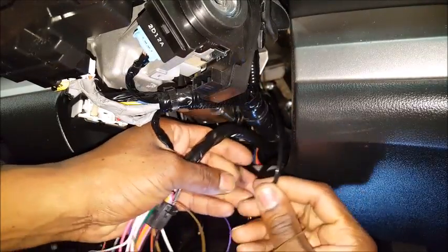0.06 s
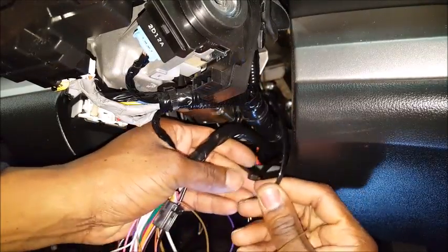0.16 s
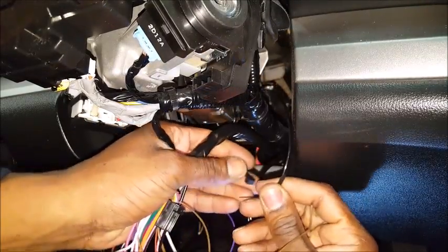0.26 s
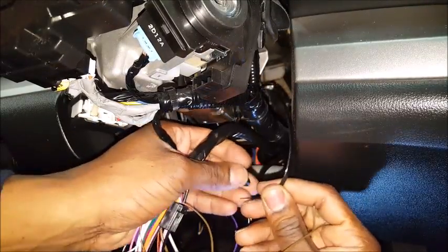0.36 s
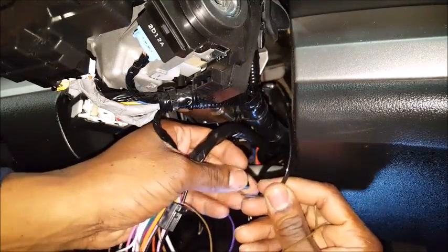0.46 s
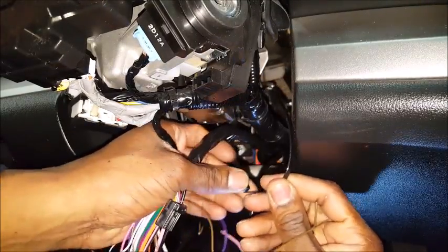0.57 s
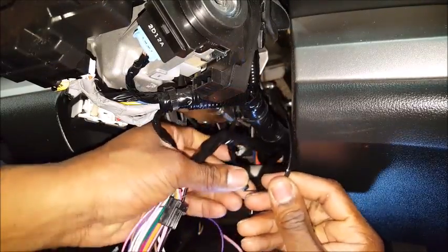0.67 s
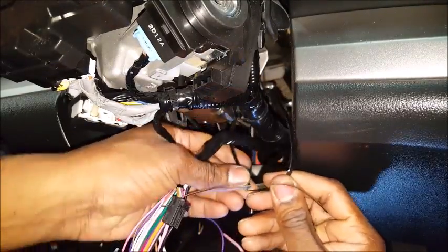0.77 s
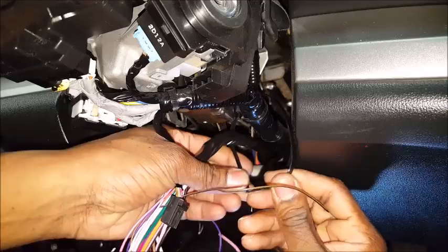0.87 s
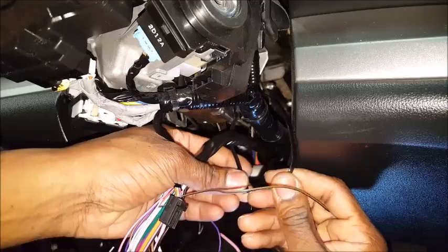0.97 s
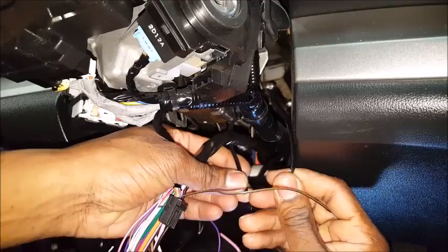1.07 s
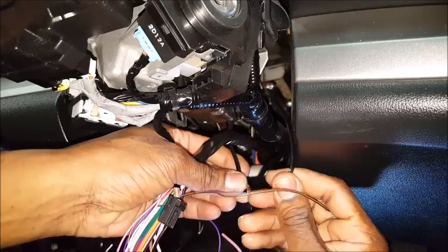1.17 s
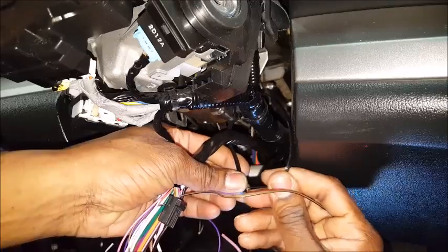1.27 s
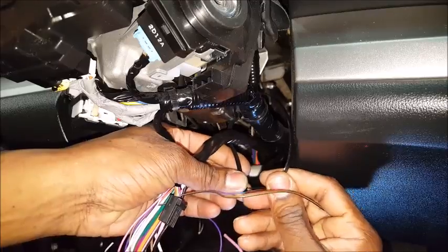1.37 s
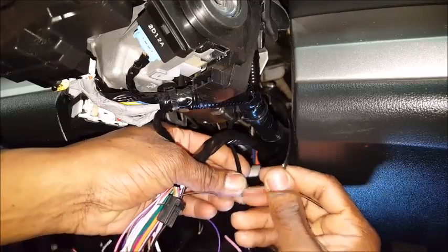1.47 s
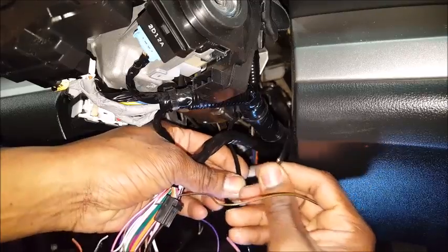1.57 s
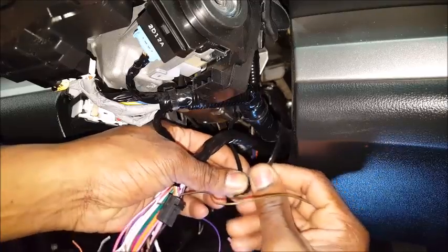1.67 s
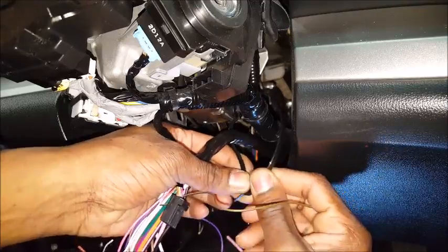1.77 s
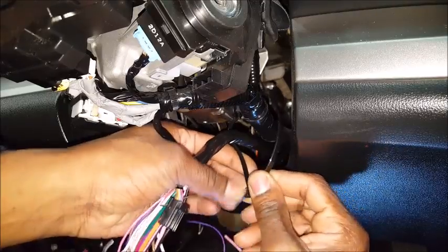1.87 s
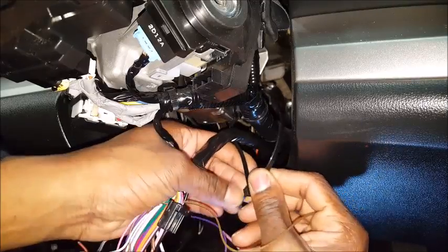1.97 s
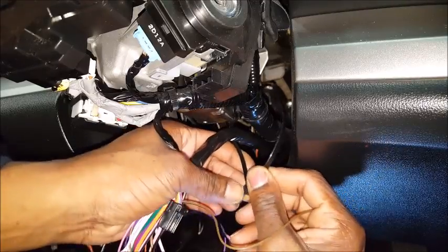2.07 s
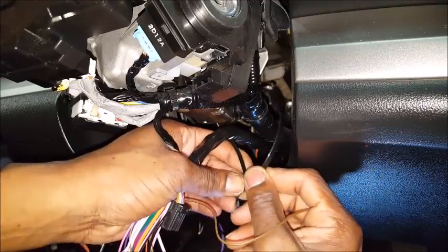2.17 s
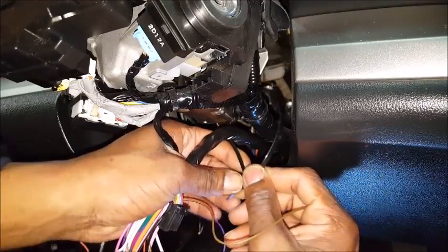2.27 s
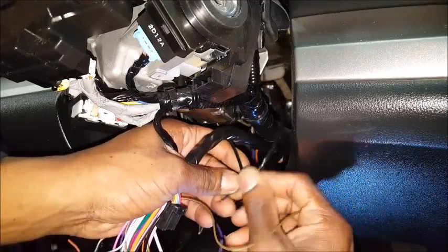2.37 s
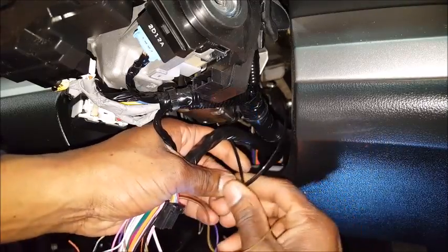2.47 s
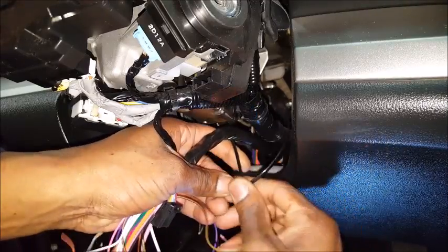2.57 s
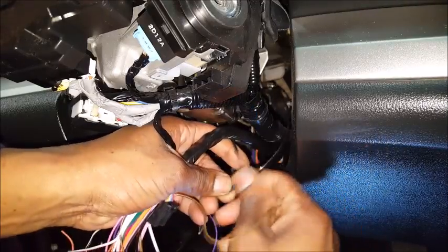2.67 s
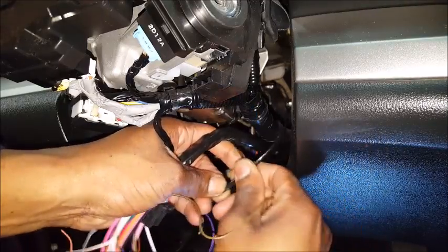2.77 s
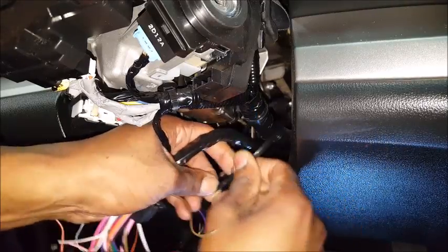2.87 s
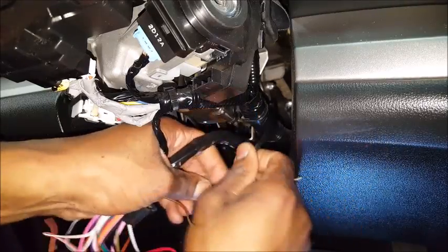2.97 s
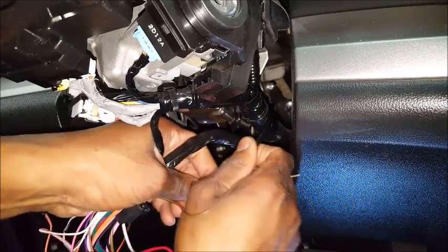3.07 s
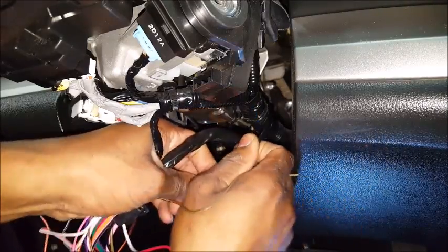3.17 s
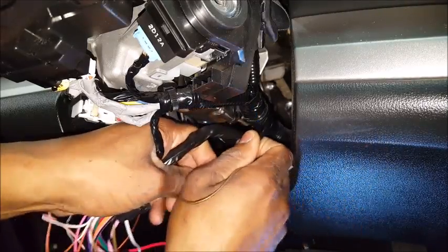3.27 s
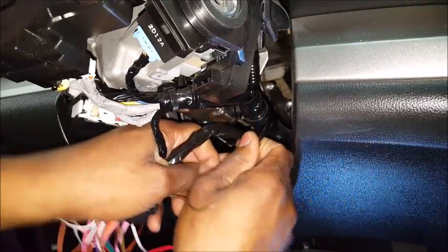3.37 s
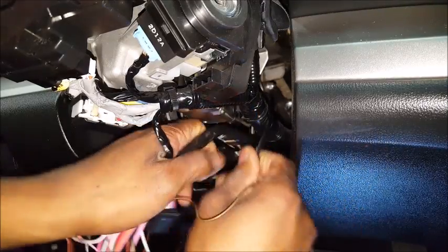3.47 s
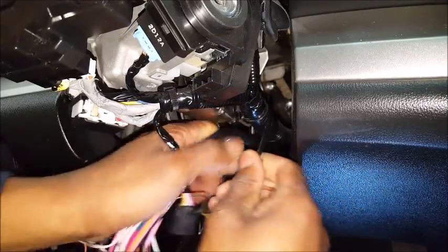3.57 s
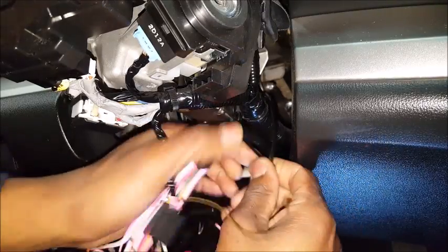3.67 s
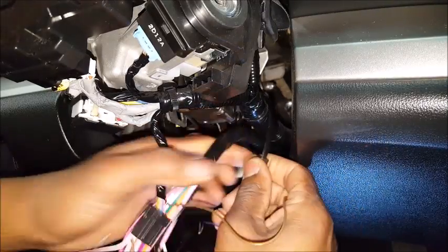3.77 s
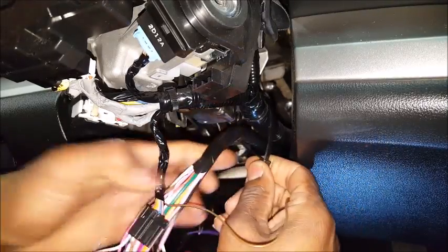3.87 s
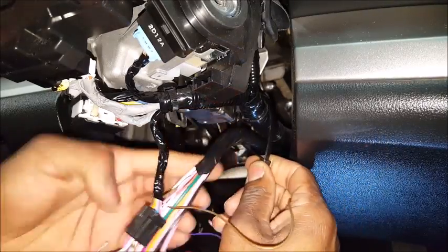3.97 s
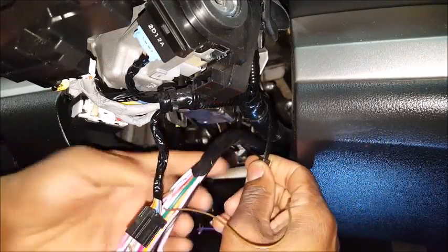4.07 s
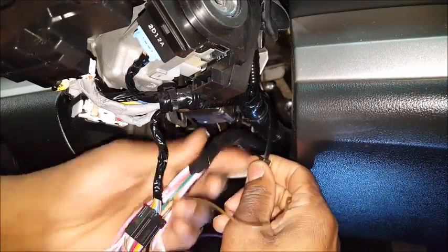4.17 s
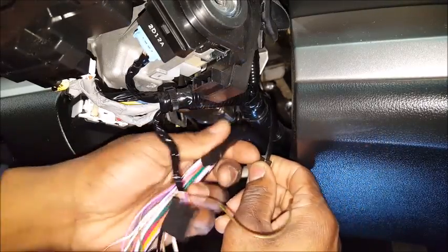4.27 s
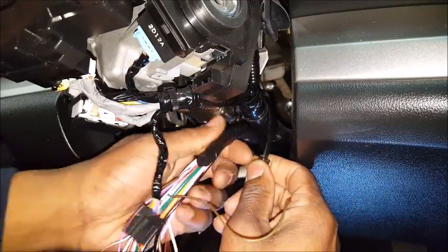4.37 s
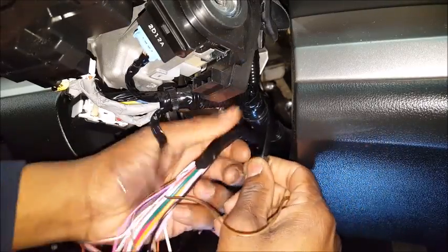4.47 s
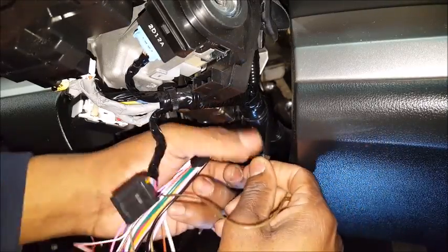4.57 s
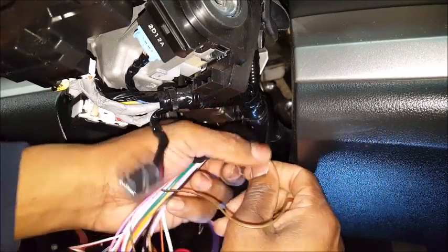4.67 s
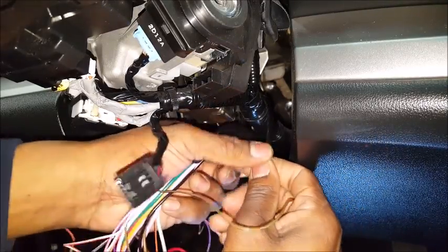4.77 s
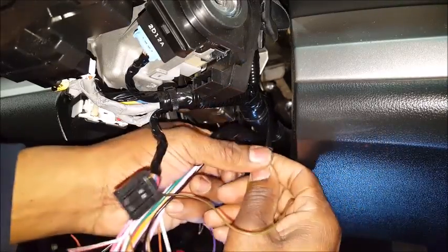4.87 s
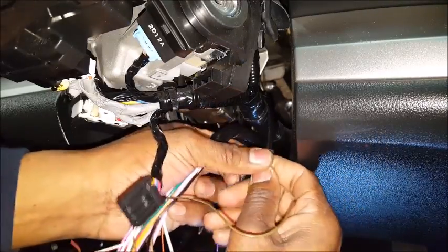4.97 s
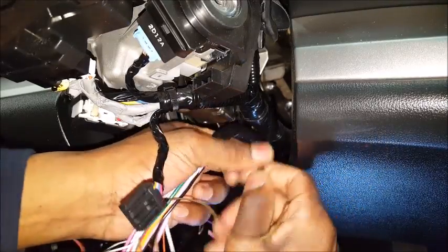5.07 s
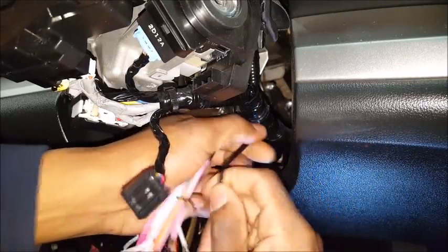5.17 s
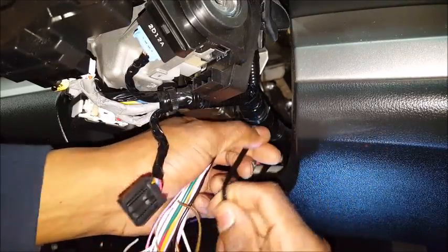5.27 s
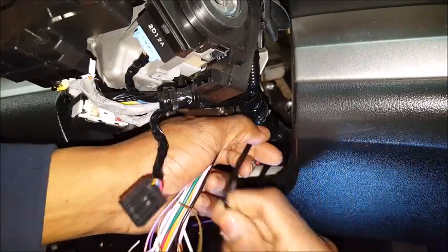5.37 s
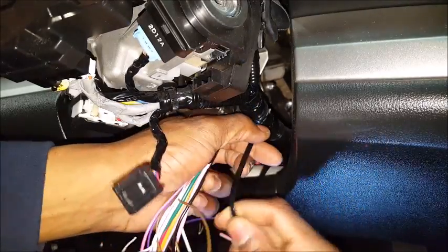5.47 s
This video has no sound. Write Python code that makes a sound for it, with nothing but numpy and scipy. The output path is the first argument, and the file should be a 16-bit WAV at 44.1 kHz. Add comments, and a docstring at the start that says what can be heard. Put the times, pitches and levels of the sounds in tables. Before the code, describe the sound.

Close stereo sound inside a quiet car. Fingers rustle and scrape faintly over taped wires with a few small plastic ticks. Near the middle, a nylon tie is pulled: a tiny zip, then bright rapid clicks with sharper cracks. Soft wire rattles and shoves follow, and near the end a fast zip breaks into single snaps. A low hush lies beneath.

```python
"""A nylon cable tie is pulled tight round a bundle of wires under a car dashboard, close by and in stereo.
The pawl snaps over the strap's teeth, one by one or in fast zips: noise bursts, with a pressure dip, crack and thud.
Wires and plastic tick with noise crackles and damped sines; a finger scrape rings hollow resonances.
Hands jostle and rustle as shaped noise, short cabin reflections follow the tie and the ticks,
and a low hush of noise with two wavering hums lies underneath."""
import sys
import numpy as np
from scipy import signal
from scipy.fft import rfft, irfft
from scipy.io import wavfile
from scipy.ndimage import uniform_filter1d

SR = 44100
rng = np.random.default_rng(int(sys.argv[2]) if len(sys.argv) > 2 else 0)


def how_loud(loudness_db):
    """Turn decibels into a plain amplitude multiplier (0 dB gives 1, 20 dB gives 10)."""
    steps = np.asarray(loudness_db, float) / 20
    return 10 ** steps


def transcribe(u):
    """Save the signal u as a 16-bit wav file named by the first command-line argument.

    u: samples, shape (n,) or (channels, n), limited to [-1, 1]; the rate is SR.
    q: integer samples, one column per channel.
    """
    v = np.clip(np.atleast_2d(u).T, -1, 1)
    q = np.round(v * 32767).astype(np.int16)
    wavfile.write(sys.argv[1], SR, q)


N = 243873  # length in samples

# Teeth where the strap catches and lets go with a crack.
# Each row: time in seconds, jerk of the strap in dB, crack in dB, snap of the pawl in dB.
CATCHES = [(2.8118, -41, -14.5, -24.5), (2.8315, -41, -13.5, -24), (2.8443, -42, -20.5, -24),
           (3.1038, -45, -22.5, -25.5), (3.1118, -34, -21.5, -25.5), (3.1213, -52, -17.5, -26.5),
           (3.1464, -48, -17, -28), (3.1968, -47, -19.5, -28.5), (3.2762, -28, -15.5, -28.5),
           (5.1139, -31, -14.5, -22.5), (5.2497, -51, -33.5, -29.5), (5.263, -53, -37.5, -29.5),
           (5.2782, -35, -26.5, -30.5), (5.3273, -39, -24.5, -29), (5.3383, -52, -34, -29),
           (5.3488, -52, -29.5, -29), (5.3608, -52, -32, -29.5), (5.3729, -52, -37, -29.5),
           (5.3822, -40, -17.5, -29.5), (5.395, -39, -26.5, -29.5), (5.4202, -46, -28.5, -30)]
# Slow, even draws of the strap, one list per draw.
# Each row: time in seconds, teeth passed, jerk in dB, snap in dB, thud of the bundle in dB.
DRAWS = [
    [(2.7539, 0, -39, -22.5, -46), (2.761, 1, -40, -22.5, -34), (2.7924, 4, -40, -23.5, -29)],
    [(2.8511, 0, -40, -24.5, -38), (2.8646, 2, -41, -24.5, -30), (2.8752, 3, -42, -25, -28),
     (2.9468, 11, -47, -24.5, -36), (2.9785, 15, -40, -23.5, -27), (2.985, 16, -39, -24, -25),
     (2.9989, 19, -39, -25, -26), (3.0311, 23, -57, -24.5, -33), (3.0657, 26, -56, -24.5, -39),
     (3.096, 29, -50, -24.5, -41)],
]
# Fast zips, one list per zip.
# Each row: time in seconds, teeth passed, jerk in dB, snap in dB, thud of the bundle in dB.
ZIPS = [
    [(2.7328, 0, -34, -20.5, -52), (2.7509, 9, -34, -23, -52)],
    [(5.1202, 0, -47, -25.5, -48), (5.142, 7, -38, -25.5, -48), (5.1627, 14, -34, -26.5, -48),
     (5.1776, 21, -40, -23.5, -48), (5.183, 24, -44, -22.5, -48), (5.192, 33, -43, -21.5, -48),
     (5.2034, 42, -44, -23.5, -48), (5.2253, 58, -49, -23.5, -48), (5.2412, 65, -50, -26.5, -48)],
]
# Colour of a snap in catches and draws. Each row: frequency in Hz, relative level in dB.
SNAP_COLOUR = [(700, -44), (2500, -37), (4300, -26), (6300, -19), (6900, -8), (10200, -1), (13000, -4),
               (15600, -8)]
# Thinner colour of a snap in a zip. Each row: frequency in Hz, relative level in dB.
ZIP_COLOUR = [(1000, -42), (2500, -30), (6200, -26), (9300, -18), (12900, 0), (15400, -14)]
# Colour of the pawl singing on after a snap. Each row: frequency in Hz, relative level in dB.
PAWL_RING = [(7000, -13.5), (9500, -44.5), (10600, 6), (11700, -1.5), (15600, -26)]
# Wires, connector and plastic ticking.
# Each row: time in seconds, crackle in dB, ring in dB, ring frequency in Hz.
TICKS = [(0.029, -50.5, -80, 2480), (0.065, -56, -51.5, 1050), (0.0821, -59, -44, 2930),
         (0.2978, -46.5, -38, 2080), (0.3103, -53, -42.5, 2130), (0.424, -72, -45, 2380),
         (0.451, -36.5, -41, 2260), (0.4946, -50.5, -44, 960), (0.549, -52, -45.5, 2150),
         (1.0895, -55.5, -44, 393), (1.3396, -57.5, -60, 2100), (1.5397, -52, -54.5, 1620),
         (1.5737, -53, -57, 2120), (1.7136, -68.5, -41, 3260), (2.1715, -50, -60, 3200),
         (2.403, -60.5, -50.5, 3300), (2.4625, -48.5, -85, 3300), (2.53, -49.5, -73, 2520),
         (2.553, -50, -54.5, 2600), (2.8272, -40, -72, 2430), (3.3056, -46.5, -51, 1210),
         (3.349, -64, -47.5, 1500), (3.394, -44.5, -50, 4140), (3.476, -45.5, -52.5, 3040),
         (3.491, -45, -53.5, 2510), (3.514, -49, -49, 2340), (3.528, -47, -58, 3500),
         (3.553, -47.5, -74, 4350), (3.59, -55.5, -53.5, 4400), (3.6285, -49.5, -40.5, 2730),
         (3.6482, -36, -48, 4060), (3.8004, -65, -51.5, 1320), (3.864, -55.5, -86, 4100),
         (4.025, -59, -57, 2030), (4.089, -48, -58.5, 3780), (4.1045, -82, -45.5, 540),
         (4.138, -65, -47.5, 930), (4.32, -59, -57, 1190), (4.3545, -87, -40, 433),
         (4.477, -63, -57.5, 1860), (4.6302, -51, -49.5, 3370), (4.808, -52.5, -48, 1970)]
# A finger scraping along the taped bundle. Each row: time in seconds, level in dB.
SCRAPE = [(.05, -72.5), (.2, -60.5), (.56, -55.5), (.74, -64), (0.819, -70)]
# Hollow resonances of the bundle, each applied twice.
# Each row: frequency in Hz, width of a single pass in Hz, relative level in dB.
SCRAPE_BODY = [(750, 460, 0), (1100, 160, -3), (2100, 590, -5.5)]
# How busy the hands are. Each row: time in seconds, rustle in dB.
HANDS = [(0, -63.5), (.3, -69), (.58, -53.5), (.83, -71), (1.04, -74), (1.5, -70), (2.1, -71.5),
         (2.4, -64.5), (2.7, -65), (3.31, -59), (3.44, -62.5), (3.56, -63.5), (3.72, -60), (3.78, -74.5),
         (4.07, -72), (4.5, -69), (4.95, -72.5), (5.53, -66.5)]
# The bundle is shoved. Each row: time in seconds, low bump in dB, its scrape in dB.
SHOVES = [(0.306, -81, -54), (1.1, -60.5, -72), (1.56, -74, -68.5), (2.053, -63, -72), (2.168, -57.5, -69),
          (2.28, -58, -64.5), (2.549, -59.5, -92), (3.537, -52, -75), (4.112, -61.5, -72),
          (4.357, -53, -67), (4.552, -57.5, -64.5), (4.816, -52.5, -62), (5.084, -56, -86)]
# Colour of the low jostling. Each row: frequency in Hz, relative level in dB.
JOSTLE = [(80, -12.5), (180, -0.5), (320, -4.5), (600, -16), (3000, -69)]
# Colour of skin on insulation. Each row: frequency in Hz, relative level in dB.
RUSTLE = [(180, -30.5), (300, -0.5), (787, -3), (1800, -10.5), (2800, -12.5), (4230, -20.5), (12700, -33.5),
          (16000, -20.5)]
# Reverberation of the cabin. Each row: frequency in Hz, time to fall by 60 dB in seconds.
CABIN = [(300, 0.043), (1000, 0.033), (3000, 0.028), (8000, 0.027), (15000, 0.018)]
# Colour of the cabin hush. Each row: frequency in Hz, relative level in dB.
HUSH = [(12, -55.5), (20, -7.5), (124, 0.5), (224, -6.5), (652, -15), (1080, -33), (2180, -29),
        (9410, -36.5), (15200, -31), (16500, -83.5)]
# Wavering low hums. Each row: frequency in Hz, width in Hz, level in dB.
HUMS = [(56.4, 16, -66.5), (112.7, 20, -66)]
# Left-right likeness of the noise layers. Each row: frequency in Hz, likeness (1 is identical).
LIKENESS = [(60, 0.49), (240, 1), (950, -0.045), (3770, -0.1), (15000, 0.064)]

CATCH_THUD_DB = -43.5
LATE_CATCHES_S = 5.3  # catches from here on rattle longer
JOSTLE_DB = -7  # steady jostling against the rustle
SHOVE_RISE_DB_PER_S, SHOVE_FALL_DB_PER_S = 435, 353.5
HUSH_DB = -65
EDGE_HZ = 15900  # top of the band


def cable_tie():
    """All the teeth of the tie: catches with a crack, slow draws and fast zips."""
    catches = np.c_[CATCHES, np.full(len(CATCHES), CATCH_THUD_DB)]
    late = catches[:, 0] > LATE_CATCHES_S
    draws = np.concatenate([run_of_teeth(rows, crack_db=-39, uneven_s=.0003, size=1) for rows in DRAWS])
    zips = np.concatenate([run_of_teeth(rows, crack_db=-30, uneven_s=.00003, size=3) for rows in ZIPS])
    slow = dict(colour=SNAP_COLOUR, ring_db=-10, ring_s=.0034, alike=.098)
    tie = ratchet(catches[~late], rattle_s=.0008, jerk_s=.00011, crack_s=.00007, **slow)
    tie += ratchet(catches[late], rattle_s=.0022, jerk_s=.00011, crack_s=.00007, **slow)
    tie += ratchet(draws, rattle_s=.0014, jerk_s=.00036, crack_s=.00016, **slow)
    tie += ratchet(zips, ZIP_COLOUR, rattle_s=.00071, jerk_s=.00016, crack_s=.00007,
                   ring_db=-14.5, ring_s=.0045, alike=.65)
    return tie


def run_of_teeth(rows, crack_db, uneven_s, size):
    """One tooth at every whole step of the strap's run, a little uneven; rows as the ratchet plays them."""
    s, passed, *levels = np.transpose(rows)
    tooth = np.arange(passed[-1] + 1)
    chance = rng.standard_normal((len(tooth), 3))
    s, jerk_db, snap_db, thud_db = (np.interp(tooth, passed, v) for v in (s, *levels))
    # averaging the gaps over several teeth makes the hand's speed change smoothly
    s[1:] = s[0] + np.cumsum(uniform_filter1d(np.diff(s), size=size))
    s = s + uneven_s * chance[:, 0]
    jerk_db = jerk_db + 1.2 * chance[:, 1]
    crack_db = crack_db + 3 * chance[:, 2]
    return np.c_[s, jerk_db, crack_db, snap_db, thud_db]


def ratchet(teeth, colour, rattle_s, jerk_s, crack_s, ring_db, ring_s, alike):
    """Each tooth: the strap jerks and cracks, the pawl rattles and sings, the bundle thuds."""
    t, out = np.arange(1024) / SR - .001, np.zeros((2, N))
    after = np.maximum(t + .0003, 0)  # rattle and thud start just ahead of the blow's centre
    jerk, crack, thud = strap_jerk(t, jerk_s), strap_crack(t, crack_s), bundle_thud(after)
    habit = rng.standard_normal((2, 1024))  # the part of the rattle that repeats from tooth to tooth
    for s, jerk_db, crack_db, snap_db, thud_db in teeth:
        noise = alike * habit + np.sqrt(1 - alike ** 2) * rng.standard_normal((2, 1024))
        snap = pawl_rattle(noise, after, colour, rattle_s) + how_loud(ring_db) * pawl_ring(after, ring_s)
        blow = how_loud(jerk_db) * jerk + how_loud(crack_db) * crack
        # the blow is louder and earlier at the left port
        sides = lean_left(1.5) * [blow, np.roll(blow, shift=3)]
        sound = how_loud(snap_db + rng.normal(0, 1.2)) * snap + sides + how_loud(thud_db) * thud
        add(out, s - .001, sound)
    return out


def strap_jerk(t, jerk_s):
    """A short dip of pressure with a softer rebound."""
    return -np.exp(-(t / jerk_s) ** 2) + .33 * np.exp(-((t - .0009) / .0008) ** 2)


def strap_crack(t, crack_s):
    """A 4.5 kHz wave squeezed into a very short bell."""
    return -np.cos(2 * np.pi * 4500 * t) * np.exp(-(t / crack_s) ** 2)


def pawl_rattle(noise, after, colour, rattle_s):
    """A bright noise burst with a quick attack and a two-stage decay."""
    attack = 1 - np.exp(-(after / .00056) ** 2)
    decay = np.exp(-after / rattle_s) + .25 * np.exp(-after / .00043)
    rattle = coloured(attack * decay * ports(noise, .6, shift=3), colour)
    return rattle / np.sqrt(np.mean(rattle[:, 32:76] ** 2))  # the first millisecond carries the level


def pawl_ring(after, ring_s):
    """The pawl sings on: narrowly coloured noise dying away."""
    ring = evened(coloured(ports(rng.standard_normal((2, 1024)), .26, shift=1), PAWL_RING))
    return ring * (after > 0) * np.exp(-after / ring_s)


def bundle_thud(after):
    """One rounded cycle of low pressure swing, slowing as it goes."""
    cycle = np.minimum(205 * after, 1) ** .7  # the whole cycle takes 1/205 s
    return -.2 * np.sin(2 * np.pi * cycle) * np.sqrt(np.abs(np.sin(np.pi * cycle)))


def ticks():
    """A short broad crackle, a dull scuff and a damped ring of hollow plastic, somewhere left or right."""
    t, out = np.arange(2048) / SR, np.zeros((2, N))
    for s, crackle_db, ring_db, hz in TICKS:
        noise = rng.standard_normal((4, 2048))
        crackle = signal.lfilter([1, -.35], [1], ports(noise, .25, shift=2))
        crackle *= 1.76 * np.exp(-t / .00044) + .38 * np.exp(-t / .0016)
        scuff = uniform_filter1d(noise[2:] + noise[2], size=6) * np.exp(-t / .0048)
        ring = np.sin(2 * np.pi * hz * t) * (1 - np.exp(-t / .00022)) * np.exp(-t / .0016)
        sound = how_loud(crackle_db) * crackle + how_loud(ring_db) * ring
        sound += how_loud(min(crackle_db, ring_db)) * scuff
        add(out, s - .0006, sound * lean_left(rng.normal(0, 1.5)))
    return out


def scrape():
    """Clumped slips of skin on tape ring the hollow bundle, louder at the left."""
    clumps = how_loud(3.06 * evened(uniform_filter1d(rng.standard_normal(N), size=500)))
    struck = rng.random((2, N)) < 3000 / SR  # 3000 slips per second
    slips = clumps * rng.standard_normal((2, N)) * struck
    hz = np.fft.rfftfreq(N, 1 / SR)
    body = sum(how_loud(db) / (1 + 2j * (hz - f) / w) ** 2 for f, w, db in SCRAPE_BODY)
    sound = evened(irfft(rfft(ports(slips, .7, shift=9)) * body, N)) * lean_left(1.6)
    return sound * how_loud(np.interp(np.arange(N) / SR, *np.transpose(SCRAPE), right=-120))


def hands():
    """Lumpy low jostling and a grainy rustle of skin on insulation, both swelling at each shove."""
    t = np.arange(N) / SR
    rustle = how_loud(np.interp(t, *np.transpose(HANDS)))
    jostle = rustle * how_loud(JOSTLE_DB)
    for s, bump_db, scrape_db in SHOVES:
        swell = how_loud(np.minimum(SHOVE_RISE_DB_PER_S * (t - s), SHOVE_FALL_DB_PER_S * (s - t)))
        jostle = jostle + how_loud(bump_db) * swell
        rustle = rustle + how_loud(scrape_db) * swell
    lumps = evened(uniform_filter1d(rng.standard_normal(N), size=900))
    low = jostle * how_loud(3 * lumps) * hiss(JOSTLE, 2.5)
    grains = how_loud(4 * np.minimum(rng.exponential(1, N), 3)) * (rng.random(N) < 150 / SR)  # 150 per second
    grain_swell = evened(1 + .28 * evened(uniform_filter1d(grains, size=120)))
    return low + specks(jostle) + rustle * hiss(RUSTLE, 2) * grain_swell


def specks(busy):
    """Faint bright ticks of wire on wire, at random but more often while the hands are busy."""
    chance = 25 * how_loud(59.5) * busy / SR  # 25 per second when busy stands at -59.5 dB
    size = how_loud(2.7 * np.minimum(rng.exponential(1, N), 2.5)) * (rng.random(N) < chance)
    fading = signal.lfilter([1], [1, -np.exp(-1 / (.0013 * SR))], size)  # 1.3 ms decay
    return how_loud(-58.5) * fading * signal.lfilter([1, -.6], [1], rng.standard_normal((2, N)))


def cabin(x):
    """Dense short reflections off dashboard and trim, the treble dying first."""
    taps = rng.standard_normal((2, 8192)) * (np.arange(8192) > .0015 * SR)  # first 1.5 ms silent
    hz, t, z = signal.stft(taps, SR, nperseg=128)
    decay = how_loud(-60 * t / read(CABIN, hz)[:, None])
    tail = signal.istft(z * decay, SR, nperseg=128)[1]
    return signal.oaconvolve(x, tail / np.linalg.norm(tail[0]), axes=1)[:, :N]


def hush():
    """Steady background noise with two low hums, each a narrow band of noise."""
    background = how_loud(HUSH_DB) * hiss(HUSH, 1.5)
    hz = np.fft.rfftfreq(N, 1 / SR)
    for f, width, db in HUMS:
        band = rfft(rng.standard_normal(N)) / (1 + (2 * (hz - f) / width) ** 2)
        background = background + how_loud(db) * evened(irfft(band, N))
    return background


def hiss(points, patchy_db):
    """Two-channel noise, alike in the bass, with small drifting patches in time and frequency."""
    frames, hz = N // 256 + 5, np.fft.rfftfreq(1024, 1 / SR)
    a, b, c, d, patches = rng.standard_normal((frames, 513, 5)).T
    patches = evened(uniform_filter1d(uniform_filter1d(patches, size=10, axis=0), size=8, axis=1))
    same = read(LIKENESS, hz)[:, None]
    left = a + 1j * b
    right = same * left + np.sqrt(1 - same ** 2) * (c + 1j * d)
    z = np.array([left, right]) * how_loud(read(points, hz)[:, None] + patchy_db * patches)
    return evened(signal.istft(z, nperseg=1024, noverlap=768)[1][:, :N])


def ports(noise, alike, shift):
    """The right port hears partly what the left one heard a few samples before."""
    right = alike * np.roll(noise[0], shift) + np.sqrt(1 - alike ** 2) * noise[1]
    return np.array([noise[0], right])


def lean_left(db):
    """Gains that raise the left side and lower the right by db."""
    return how_loud(np.array([[db], [-db]]))


def coloured(x, points):
    """Shapes the spectrum of x along its last axis."""
    hz = np.fft.rfftfreq(x.shape[-1], 1 / SR)
    return irfft(rfft(x) * how_loud(read(points, hz)), x.shape[-1])


def read(points, hz):
    """Reads a table along log frequency."""
    f, value = np.transpose(points)
    return np.interp(np.log(hz + 1), np.log(f + 1), value)


def evened(x):
    """Scales to rms 1."""
    return x / np.sqrt(np.mean(x ** 2) + 1e-20)


def add(mix, s, sound):
    """Mixes a sound in at second s."""
    part = mix[:, round(s * SR):][:, :sound.shape[1]]
    part += sound[:, :part.shape[1]]


def scene():
    """Cable tie and ticks with their reflections, over scrape, hands and hush."""
    tie = cable_tie()
    bumps = ticks()
    reflections = cabin(how_loud(-9) * tie + how_loud(-.5) * bumps)
    return tie + bumps + reflections + scrape() + hands() + hush()


def low_pass(x):
    """Removes everything above the highest recorded frequency."""
    return signal.sosfilt(signal.butter(12, 17090, fs=SR, output="sos"), x)


def record(dry):
    """Limits the band with a steep low-pass and hands on the finished mix."""
    limited = signal.oaconvolve(dry, signal.firwin(255, EDGE_HZ, fs=SR)[None], "same")
    return low_pass(limited)


dry = scene()
out = record(dry)
transcribe(out)
```